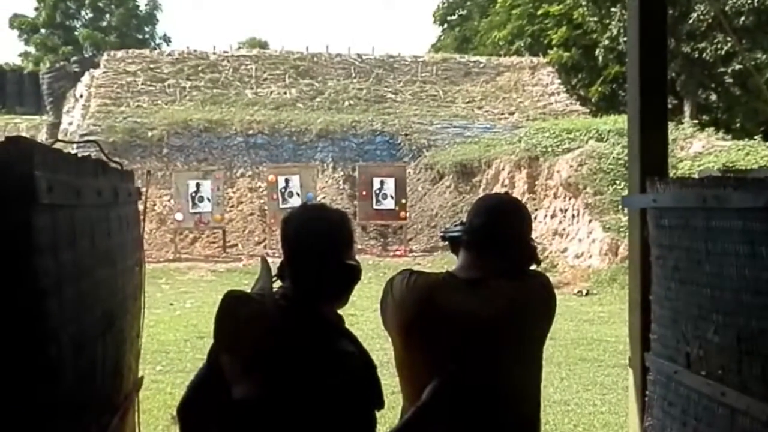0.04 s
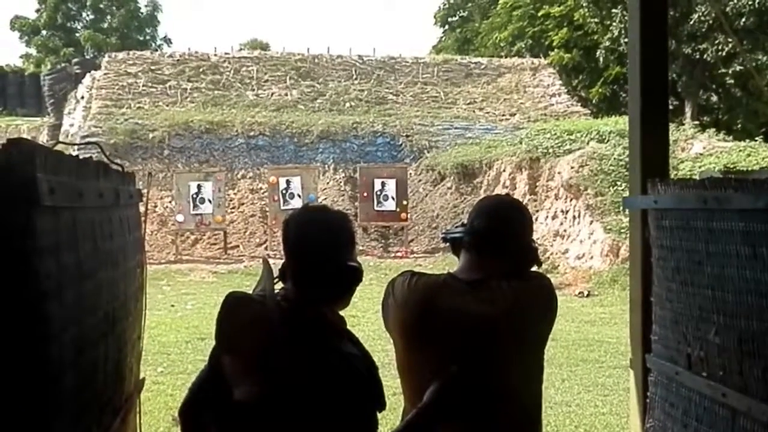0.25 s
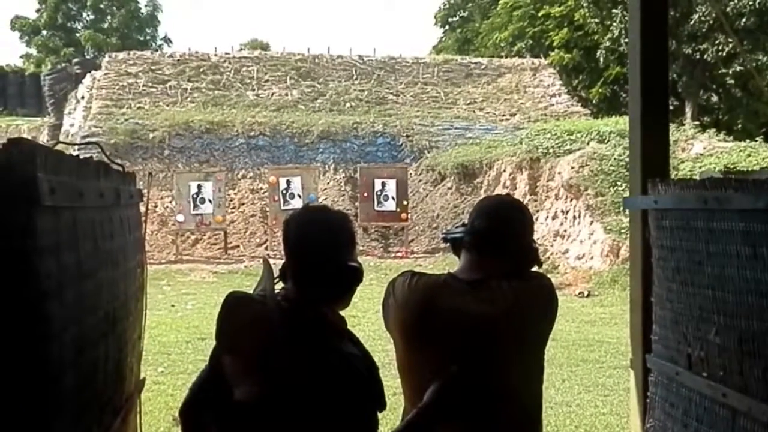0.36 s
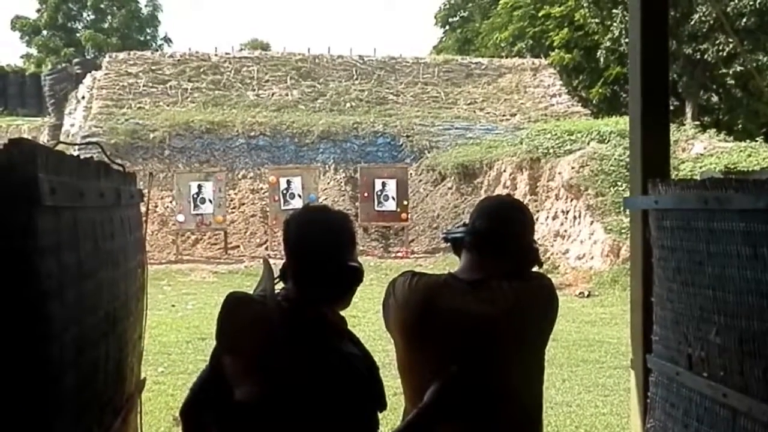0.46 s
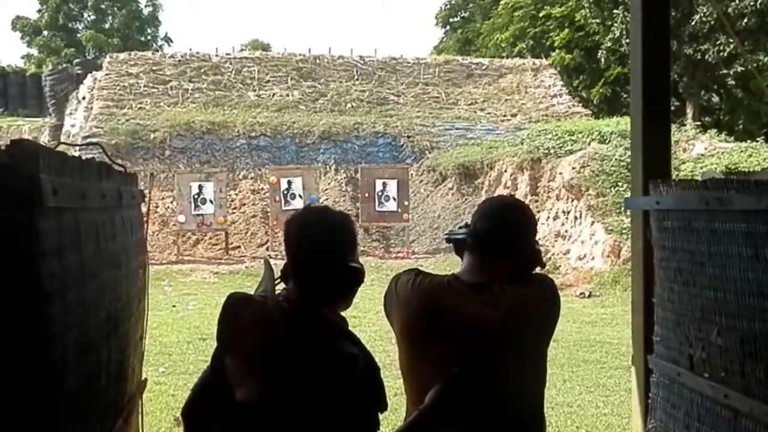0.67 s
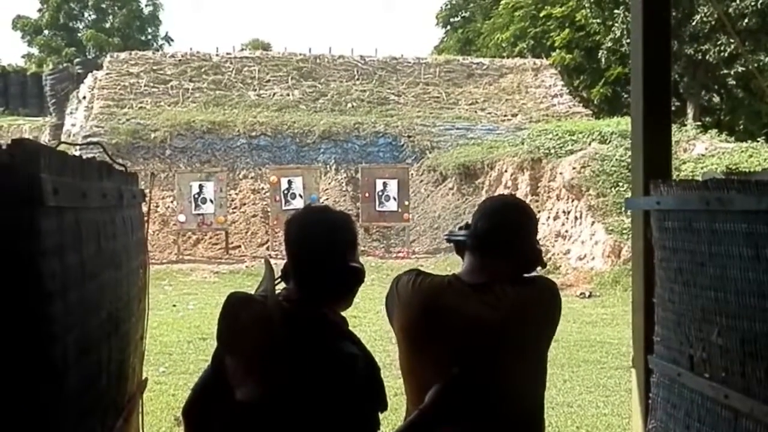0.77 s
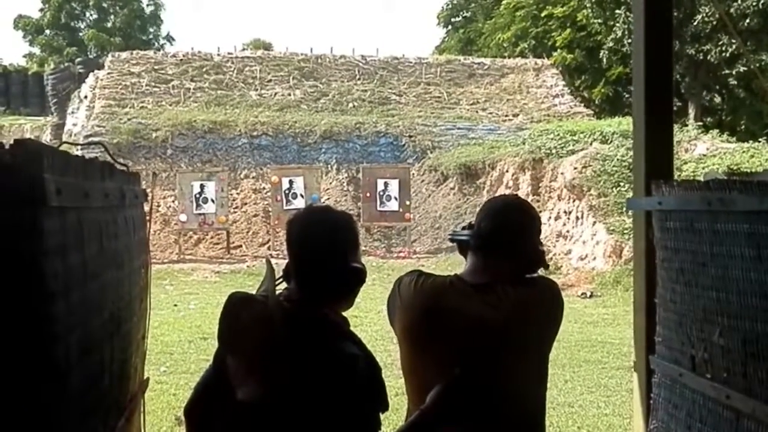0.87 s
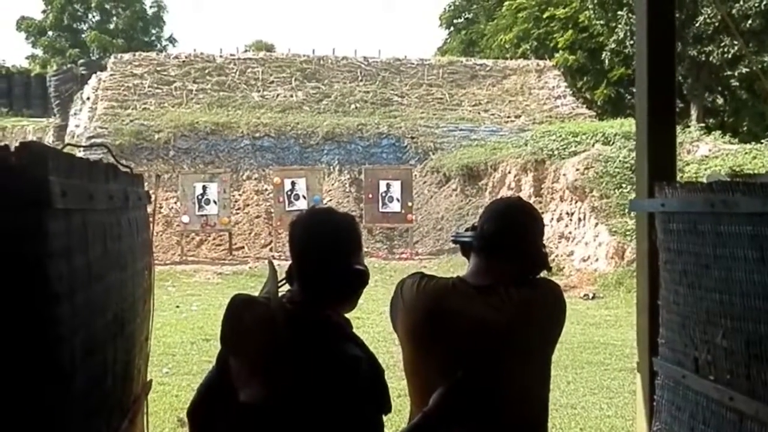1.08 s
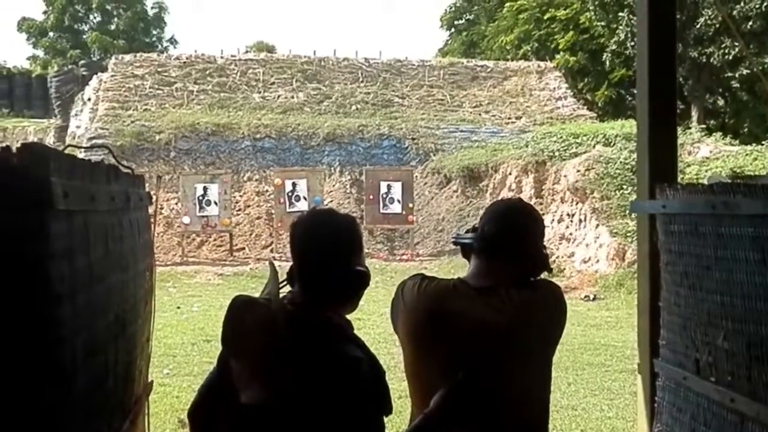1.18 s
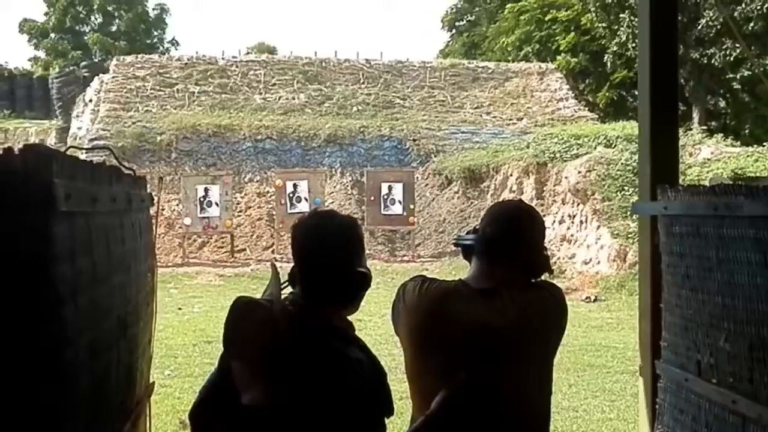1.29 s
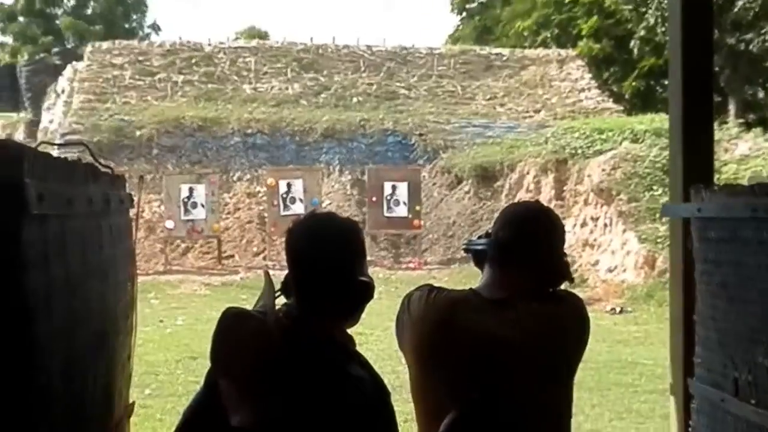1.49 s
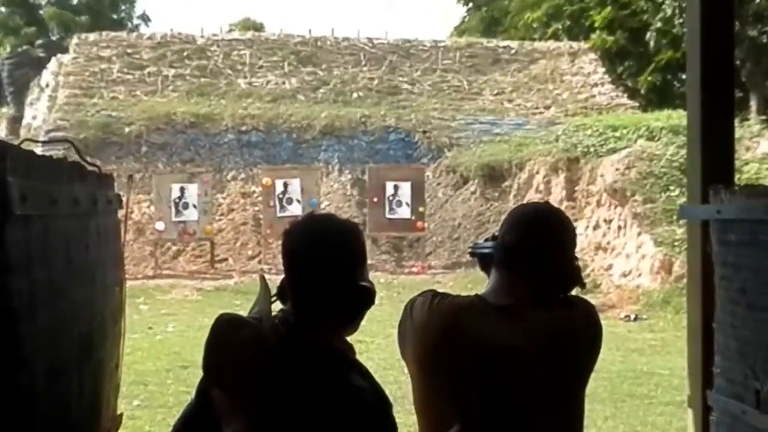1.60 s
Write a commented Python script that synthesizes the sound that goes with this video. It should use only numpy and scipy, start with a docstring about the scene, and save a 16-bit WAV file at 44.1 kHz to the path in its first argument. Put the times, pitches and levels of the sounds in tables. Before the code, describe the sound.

One loud handgun shot goes off close to the microphone under the roof of an outdoor range, after a faint engine idle and insects. The blast overloads, a sharp clack follows, and the echo rolls away.

```python
"""A far engine idles in open air, insects buzz and something thuds in the distance. Then one handgun shot,
close to the microphone, under the roof of an outdoor range: the action snaps, the muzzle blast overloads
the microphone, booms in the shelter and rolls around the range. A sharp clack follows, probably the
bullet landing. The recorder's limiter ducks the background, and its noise suppressor cuts faint bands."""
import sys
import numpy as np
from scipy import signal
from scipy.fft import rfft, irfft
from scipy.io import wavfile
from scipy.ndimage import uniform_filter1d

SR = 44100
rng = np.random.default_rng(int(sys.argv[2]) if len(sys.argv) > 2 else 0)


def dump_mix(stems):
    """Bounce the given channels to the path in sys.argv[1] as a 16-bit WAV at rate SR."""
    frames = np.atleast_2d(stems).T  # one column per channel
    limited = np.clip(frames, -1, 1)  # hard clip at full scale
    pcm = np.round(limited * 32767).astype(np.int16)
    wavfile.write(sys.argv[1], SR, pcm)


N = 72765


def amp(db):
    """Decibels to gain."""
    return 10 ** (np.asarray(db) / 20)


def unit_rms(x):
    """Scales to rms 1."""
    return x / np.sqrt(np.mean(x ** 2) + 1e-20)


def curve_at(points, hz):
    """Interpolates a table on a log-frequency axis."""
    f, value = np.transpose(points)
    return np.interp(np.log(hz + 1), np.log(f + 1), value)


def add(mix, start_s, sound):
    """Mixes a sound in at the given time."""
    part = mix[round(start_s * SR):][:len(sound)]
    part += sound[:len(part)]


def clock():
    """Time of every sample in seconds."""
    return np.arange(N) / SR


def noise(colour):
    """Steady noise of rms 1; the colour (f/Hz, level/dB) sets only the shape of its spectrum."""
    hz = np.fft.rfftfreq(N, 1 / SR)
    return unit_rms(irfft(rfft(rng.standard_normal(N)) * amp(curve_at(colour, hz)), N))


def drift(rate_hz):
    """Slow random wander of rms 1."""
    hz = np.fft.rfftfreq(N, 1 / SR)
    return unit_rms(irfft(rfft(rng.standard_normal(N)) * np.exp(-(hz / rate_hz) ** 2), N))


def fuzzy_tone(hz, width_hz):
    """A tone of rms 1 whose pitch wanders over the given width."""
    cycles = rng.random() + np.cumsum(hz + width_hz / 2 * drift(width_hz)) / SR
    return np.sqrt(2) * np.sin(2 * np.pi * cycles)


def decay(t, t60):
    """Holds at 1 until t = 0, then falls 60 dB every t60 seconds."""
    return np.exp(-np.log(1000) * np.maximum(t, 0) / t60)


def burst(colour, db, rise_s, t60):
    """Coloured noise that rises and dies away."""
    t = clock()
    return amp(db) * noise(colour) * np.minimum(t / rise_s, 1) * decay(t - rise_s, t60)


def open_air(db=-28.5):
    """The steady, low wash of the open range."""
    colour = [(15, -30.5), (25, -9.5), (178, -4.5), (331, -7), (445, -2), (631, -7.5), (762, -2),
              (1140, -10.5), (2490, -16.5), (4040, -26.5), (4620, -24), (8130, -35.5), (9810, -42),
              (10600, -45), (15500, -45.5)]  # air spectrum: f/Hz, level/dB
    return amp(db) * noise(colour)


def far_engine(firing_hz=22.4, waver=0.0013, flutter=0.086, chug_db=-32, chug_s=0.055, sharpness=1.5):
    """A distant idle: harmonics of an unsteady firing rate, and an exhaust chug every second firing."""
    harmonics = [(2, -45), (5, -35), (6, -40.5), (7, -37), (8, -36), (9, -38.5), (10, -37.5), (11, -46.5),
                 (12, -35), (13, -41.5), (20, -43)]  # engine hum: multiple of the firing rate, rms level/dB
    exhaust = [(20, -24), (40, -1.5), (70, -9), (115, -1.5), (200, -1.5), (320, -20.5), (1000, -59)]  # chug spectrum: f/Hz, level/dB
    firings = np.cumsum(firing_hz * (1 + waver * drift(3.6))) / SR
    hum = np.zeros(N)
    for multiple, db in harmonics:
        level = amp(db) * np.sqrt(2) * (1 + flutter * drift(24))
        hum += level * np.sin(2 * np.pi * (multiple * firings + rng.random()))
    puffs = np.exp(sharpness * np.cos(np.pi * (firings - chug_s * firing_hz)))
    return hum + amp(chug_db) * unit_rms(puffs * noise(exhaust))


def far_thuds():
    """Dull knocks a long way from the microphone."""
    thuds = [(.2, -20.5, 0.22), (.245, -27, 0.49), (1.31, -19, 0.075)]  # knocks: t/s, level/dB, t60/s
    colour = [(100, -19), (350, -4.5), (900, -1.5), (1400, -7), (2500, -17), (5000, -38), (12000, -54.5)]  # thud spectrum: f/Hz, level/dB
    out = np.zeros(N)
    for start_s, db, t60 in thuds:
        add(out, start_s, burst(colour, db, rise_s=0.008, t60=t60))
    return out


def insects(width_hz=220, rasp=0.62, overlap_s=0.067):
    """Thin rasping buzzes that alternate between two pitches and run into each other."""
    buzzes = [(.15, .05, 10500, -67), (.22, .025, 10800, -67), (0.247, 0.1, 10480, -56.5),
              (0.32, 0.037, 10900, -58), (0.374, 0.039, 10450, -54.5), (0.44, .032, 10900, -63),
              (0.454, 0.04, 10800, -59.5)]  # insect calls: t/s, length/s, f/Hz, level/dB
    out = np.zeros(N)
    for start_s, length_s, hz, db in buzzes:
        swell = signal.windows.hann(round((length_s + 2 * overlap_s) * SR))
        buzz = fuzzy_tone(hz, width_hz) * (1 + rasp * drift(width_hz))
        add(out, start_s - overlap_s, amp(db) * swell * buzz[:len(swell)])
    return out


def rustle(start_s=0.315):
    """A brief soft rustle before the shot."""
    colour = [(300, -19.5), (2500, -3), (6000, 4), (10000, -10), (15000, -10)]  # rustle spectrum: f/Hz, level/dB
    out = np.zeros(N)
    add(out, start_s, burst(colour, db=-41.5, rise_s=0.018, t60=0.46))
    return out


def bullet_strike(start_s=0.6219, ring_db=27.5):
    """A clack, probably the bullet landing: a tick and the short ring of what it hits."""
    modes = [(1860, -9.5, 0.03), (2710, -2.5, .02), (2846, -3, 0.017), (3040, 0.5, 0.024),
             (6370, -11.5, .02)]  # ring of the struck object: f/Hz, relative level/dB, t60/s
    colour = [(500, -1), (1500, 5), (2900, 0.5), (4000, 0.5), (6300, -9), (10000, -17), (15000, -13.5)]  # tick spectrum: f/Hz, level/dB
    t, out = clock(), np.zeros(N)
    ring = sum(amp(db) * np.sin(2 * np.pi * (hz * t + rng.random())) * decay(t, t60)
               for hz, db, t60 in modes)
    tick = burst(colour, db=21.5, rise_s=0.00056, t60=0.015)
    add(out, start_s, amp(ring_db) * ring + tick)
    return out


def gun_action(low_cut_hz=1260):
    """Bright mechanical snaps close to the microphone, just ahead of the blast."""
    snaps = [(0.498, -13.5, 0.023), (.504, -16.5, .05)]  # snaps of the action: t/s, level before the low cut/dB, t60/s
    colour = [(1000, -16.5), (1800, -10.5), (3200, -2), (4400, -3), (6000, -12.5), (8000, -9.5),
              (10500, -21.5), (15000, -13.5)]  # snap spectrum: f/Hz, level/dB
    out = np.zeros(N)
    for start_s, db, t60 in snaps:
        add(out, start_s, burst(colour, db, rise_s=0.00029, t60=t60))
    return signal.sosfilt(signal.butter(2, low_cut_hz, "high", fs=SR, output="sos"), out)


def hard_echoes():
    """The blast comes back as a few dull pulses, each a push and then a pull."""
    echoes = [(.5936, 28.5, 0.00032), (0.6036, 28.5, 0.00034), (0.6727, 23.5, 0.00022),
              (0.6784, 23, 0.00031), (.6913, 20, 0.00029)]  # reflections: t/s, peak level/dB, pulse length/s
    t, out = clock(), np.zeros(N)
    for start_s, db, length_s in echoes:
        u = (t - start_s) / length_s - 1
        out -= amp(db) * u * np.exp((1 - u ** 2) / 2)
    return out


def range_roll(db=27, rise_s=0.045, lump_db=0.97, lump_hz=303):
    """The blast scattered in lumps by banks and trees; the treble dies first."""
    colour = [(40, -46), (130, -19.5), (200, -21), (290, -5.5), (450, -5.5), (680, -2), (1080, -9),
              (1400, -14), (2000, -17), (2900, -16), (3500, -21.5), (4800, -22), (8000, -31.5),
              (11000, -40), (15000, -38.5)]  # roll spectrum: f/Hz, level/dB
    decay_times = [(60, 1), (180, 1), (300, 0.82), (800, 0.89), (2500, 0.79), (5000, 0.77), (8000, 0.63),
                   (14000, .46)]  # reverberation of the range: f/Hz, t60/s
    hz, t, bands = signal.stft(noise(colour), SR, nperseg=512)
    bands *= decay(t, curve_at(decay_times, hz)[:, None])
    tail = signal.istft(bands, SR, nperseg=512)[1][:N]
    return amp(db + lump_db * drift(lump_hz)) * tail * np.minimum(clock() / rise_s, 1)


def shelter_boom():
    """Resonances build up under the roof and die away."""
    modes = [(795.5, 35, 28.5, 0.025, .16), (516, 50, 24, .012, .19), (311.7, 70, 19, .07, 0.233),
             (128, 100, 11, .008, 0.055)]  # shelter resonances: f/Hz, width/Hz, level/dB, build-up/s, t60/s
    t, out = clock(), np.zeros(N)
    for hz, width_hz, db, rise_s, t60 in modes:
        envelope = np.minimum(t / rise_s, 1) ** 2 * decay(t - rise_s, t60)
        out += amp(db) * fuzzy_tone(hz, width_hz) * envelope
    return out


def booth_crack():
    """The first scatter of the blast off the booth walls."""
    colour = [(40, -30.5), (120, -5), (320, -5), (850, 1), (1400, -6.5), (2900, -9.5), (5000, -12),
              (7000, -18.5), (10500, -29), (14000, -27)]  # scatter spectrum: f/Hz, level/dB
    return burst(colour, db=32.5, rise_s=0.0018, t60=0.18)


def muzzle_shock(db=41.5, length_s=0.00017):
    """A pressure jump followed by suction."""
    u = clock() / length_s
    return amp(db) * (1 - u) * np.exp(-u)


def blast(start_s=0.5136):
    """The shock at close range, and the answer of booth, shelter and range."""
    out = np.zeros(N)
    add(out, start_s, muzzle_shock() + booth_crack() + range_roll() + shelter_boom())
    return out + hard_echoes()


def scene():
    """Everything that reaches the one microphone under the roof."""
    shot = blast() + gun_action() + bullet_strike()
    background = far_engine() + insects() + open_air() + far_thuds() + rustle()
    return (shot + background)[None]


def suppress_noise(x, slope=4.5, hold_s=0.2, close_db_per_s=131):
    """After a short hold, gradually turns down the bands whose smoothed level is under the threshold."""
    threshold = [(100, -115), (300, -86.5), (800, -67.5), (1300, -73.5), (2000, -81.5), (3000, -84.5),
                 (6000, -85.5), (10000, -99), (15000, -103)]  # suppressor threshold: f/Hz, level/dB per Hz
    floor = [(100, 5), (700, -6), (1100, -13), (1500, -15.5), (2500, -30), (15000, -37)]  # lowest gain: f/Hz, gain/dB (no cut where above 0)
    framing = dict(nperseg=512, noverlap=384, scaling="psd")
    hz, t, bands = signal.stft(x, SR, **framing)
    power = uniform_filter1d(2 * abs(bands) ** 2, size=9, axis=0)  # smooth over frequency
    power = uniform_filter1d(power, size=13, axis=1)  # and over time
    over_db = 10 * np.log10(abs(power) + 1e-20) - curve_at(threshold, hz)[:, None]
    gain_db = np.clip(slope * over_db, curve_at(floor, hz)[:, None], 0)
    earlier = np.searchsorted(t, t - hold_s)
    gain_db = np.maximum(gain_db, gain_db[:, earlier])
    fall_db = close_db_per_s * t
    gain_db = np.maximum.accumulate(gain_db + fall_db, axis=1) - fall_db
    return signal.istft(bands * amp(gain_db), SR, **framing)[1][:N]


def limiter(x, ceiling_db=-0.5, recover_db_per_s=10):
    """Ducks at once on a peak and recovers slowly."""
    level_db = 20 * np.log10(abs(x) + 1e-9)
    fall_db = recover_db_per_s * clock()
    held_db = np.maximum.accumulate(level_db + fall_db) - fall_db
    return x * amp(-np.maximum(held_db - ceiling_db, 0))


def record(dry, overload_db=36, high_cut_hz=15780):
    """The microphone overloads; the recorder limits, suppresses noise and cuts the top treble."""
    overloaded = amp(overload_db) * np.tanh(dry[0] / amp(overload_db))
    ducked = suppress_noise(limiter(overloaded))
    high_cut = signal.firwin(511, high_cut_hz, window=("kaiser", 9), fs=SR)
    return signal.oaconvolve(ducked, high_cut, "same")[None]


dry = scene()
out = record(dry)
dump_mix(out)
```